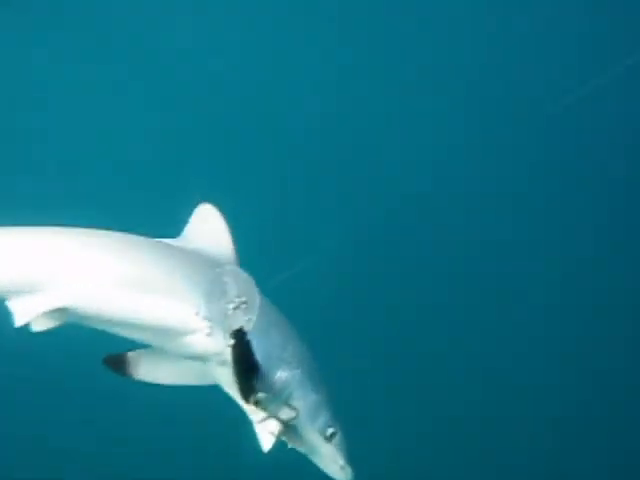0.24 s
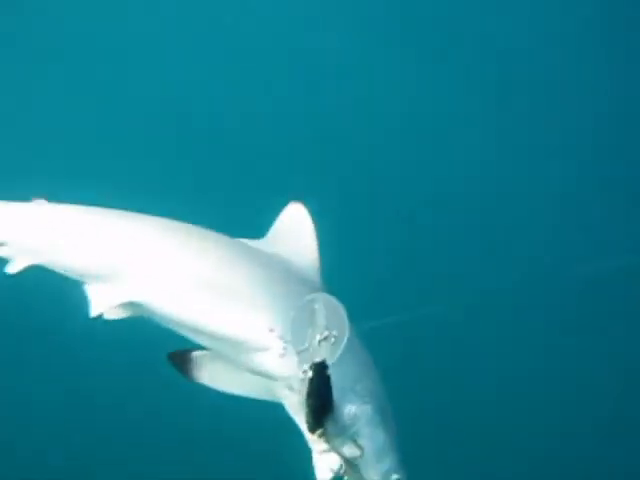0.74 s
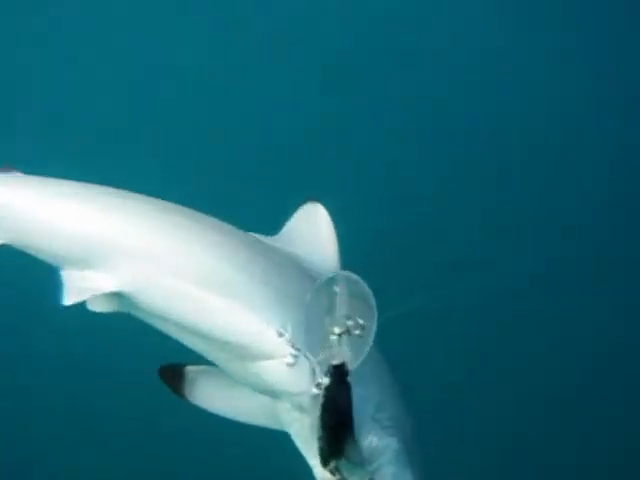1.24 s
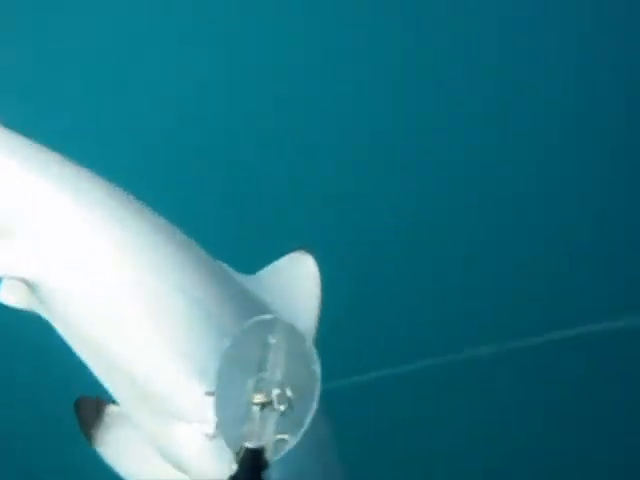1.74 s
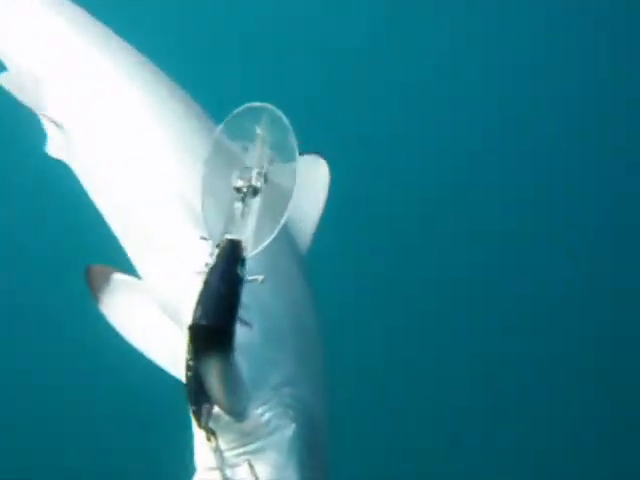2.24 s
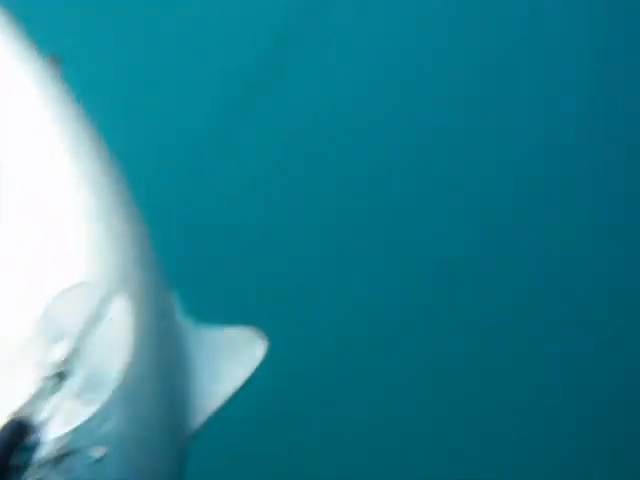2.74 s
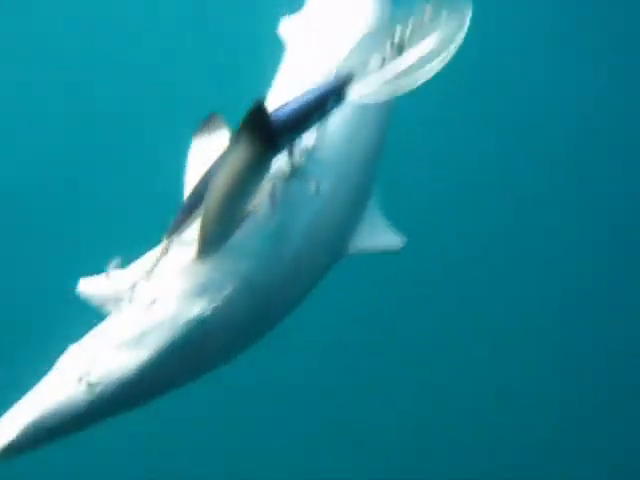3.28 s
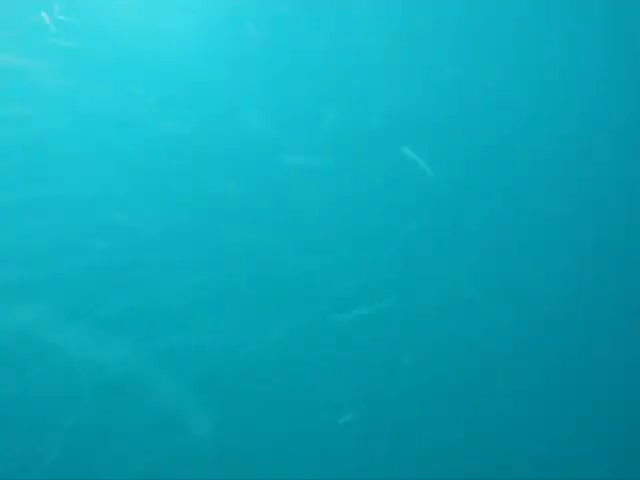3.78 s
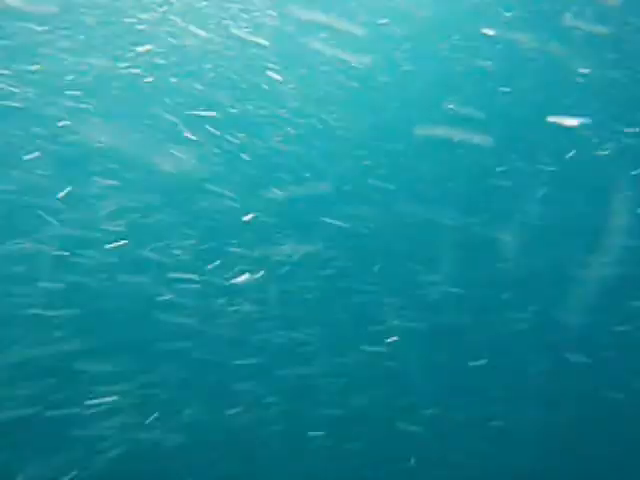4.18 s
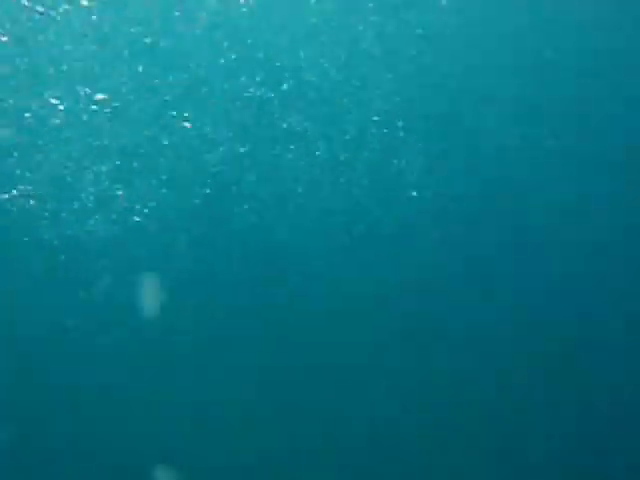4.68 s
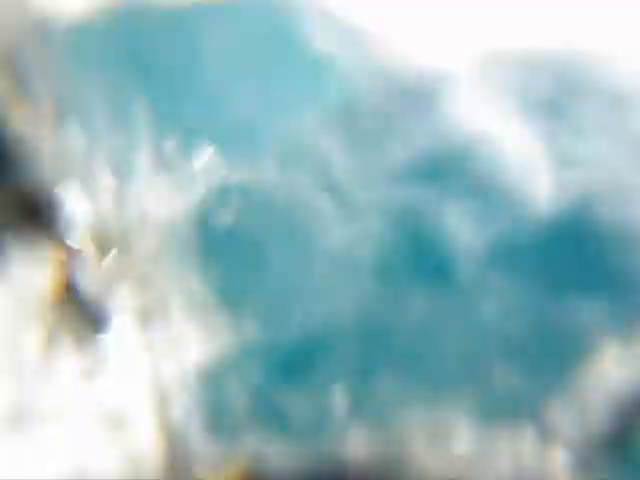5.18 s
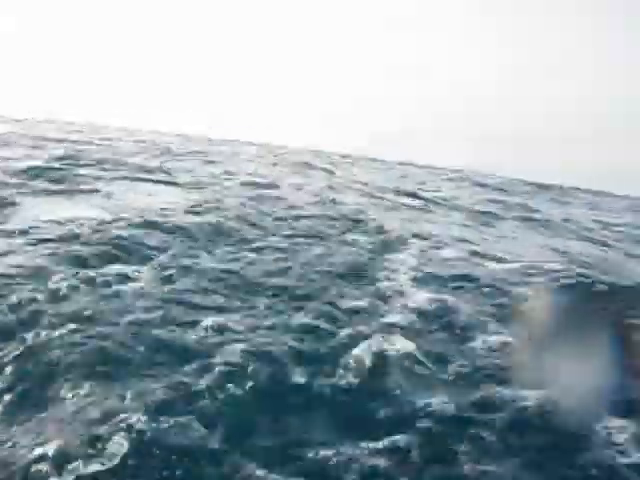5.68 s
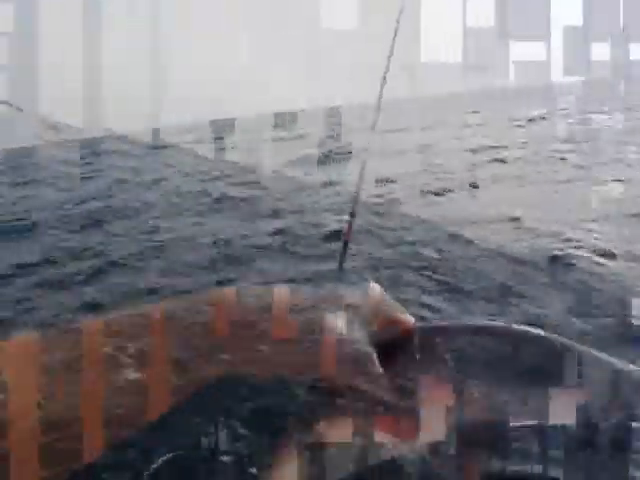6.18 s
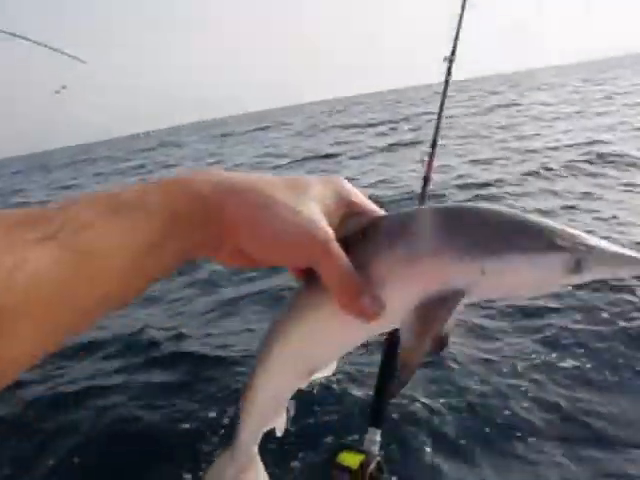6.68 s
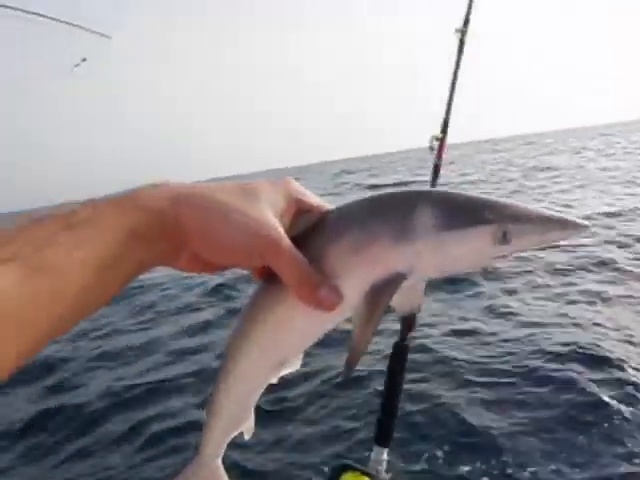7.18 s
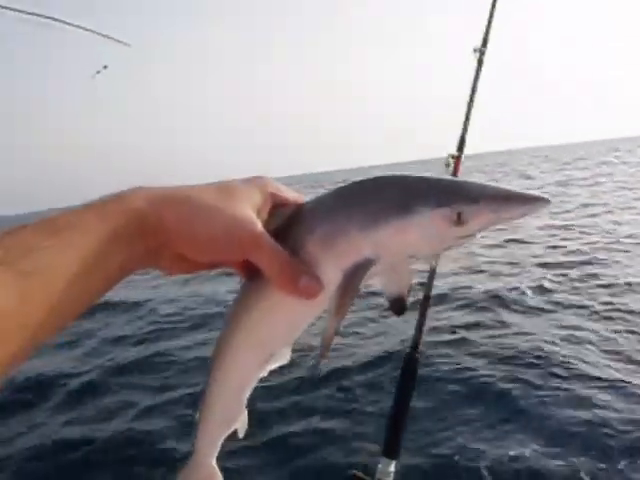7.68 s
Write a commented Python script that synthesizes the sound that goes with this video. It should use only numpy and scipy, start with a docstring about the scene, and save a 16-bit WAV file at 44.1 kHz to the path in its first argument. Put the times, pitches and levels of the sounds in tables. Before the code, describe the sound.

Inside a sealed camera housing towed underwater, two outboard engines make a rough, fluttering, nasal drone with low watery rumbling and hollow metallic rings. Rings crowd together around four seconds, then the housing breaks the surface in harsh slaps and overloaded splashes. The underwater drone stops; muffled engine and sea noise remains with gurgles and slops. Close, narrow, boxy microphone with little bass.

```python
"""A throbbing underwater drone with loud ringing peaks, then slaps and gurgles afloat, overloaded.
A small camera in a sealed housing is towed behind two outboard engines and breaks the surface.
Drone: noise gated by the firings rings the modes of the housing. Peaks: short unsteady cosines with
noise slaps. Water: coloured sparse clicks. Afloat: coloured noise and a wavering sine, the exhaust note.
A limiter, a narrow low-pass and a hard clip shape the sum; a faint camera hiss lies under it."""
import sys
import numpy as np
from scipy import signal
from scipy.fft import rfft, irfft
from scipy.io import wavfile
from scipy.ndimage import uniform_filter1d, minimum_filter1d

SR = 44100
rng = np.random.default_rng(int(sys.argv[2]) if len(sys.argv) > 2 else 0)


def wav_record(signal):
    """Record a signal, one row per channel, as 16-bit PCM in the file named by sys.argv[1]."""
    frames = np.transpose(np.atleast_2d(signal))
    bounded = np.clip(frames, -1, 1)
    # unit amplitude maps onto the largest positive 16-bit level
    quanta = np.round(bounded * 32767).astype(np.int16)
    wavfile.write(sys.argv[1], SR, quanta)


N = 349713


def amp(db):
    """Decibels to gain."""
    return 10 ** (np.asarray(db) / 20)


def evened(x):
    """Scales to unit rms."""
    return x / np.sqrt(np.mean(x ** 2) + 1e-20)


def curves(table, t_s):
    """Every column of a table read at the times t_s, held flat outside it."""
    knots_s, *columns = np.transpose(table)
    return [np.interp(t_s, knots_s, column) for column in columns]


def drift(hz):
    """Slow random curve of unit rms: noise low-passed at hz."""
    slow = signal.lfilter(*signal.butter(2, hz, fs=SR), rng.standard_normal(N + SR))
    return evened(slow[SR:])  # filter settled


def resonate(x, hz, width_hz):
    """Moving resonance: shifts the curve hz down to zero, smooths twice, shifts back."""
    turn = np.exp(2j * np.pi * np.cumsum(hz) / SR)
    r = np.exp(-np.pi * width_hz / SR)
    smooth = signal.lfilter([(1 - r) ** 2], [1, -2 * r, r * r], x / turn)
    return 2 * (turn * smooth).real


def coloured(x, spectrum):
    """Filters x to a spectrum table, log-frequency interpolated; unit rms."""
    f_hz, level_db = np.transpose(spectrum)
    bins_hz = np.fft.rfftfreq(len(x), 1 / SR)
    gain = amp(np.interp(np.log(bins_hz + 1), np.log(f_hz + 1), level_db))
    return evened(irfft(rfft(x) * gain, len(x)))


def lumpy(per_s, spread_db):
    """Sparse clicks of random sign, a few of them large; unit rms."""
    size_db = spread_db * np.minimum(rng.exponential(1, N), 4)
    clicks = amp(size_db) * rng.standard_normal(N)
    return evened(clicks * (rng.random(N) < per_s / SR))


def tent(t_s, centre_s, half_s):
    """Distance from centre_s, in half-lengths."""
    return abs(t_s - centre_s) / half_s


def afloat(t_s):
    """Share of the housing out of the water."""
    return np.clip((t_s - 5.7) / 0.23, 0, 1)


def camera_hiss():
    """Faint steady camera hiss: noise through one broad fixed resonance."""
    noise = rng.standard_normal(N)
    return amp(-60.5) * evened(resonate(noise, np.full(N, 2800.), 1900.0))


# engines and sea through the air-filled housing: f/Hz, level/dB (per Hz)
AIR_SPECTRUM = [(35, -54.5), (60, -17.5), (185, 1), (462, -8.5), (832, -7), (956, -7), (1260, -12),
                (1450, -10), (1580, -15.5), (1780, -13.5), (2010, -13.5), (2120, -23), (2350, -22),
                (3100, -26.5), (3750, -38.5), (4880, -54), (8250, -120)]
AIR_DB = -31.5


def air_bed(t_s):
    """Engines and sea heard afloat: coloured noise with a drifting level."""
    level_db = AIR_DB + 2.1 * drift(15)
    return afloat(t_s) * amp(level_db) * coloured(rng.standard_normal(N), AIR_SPECTRUM)


# exhaust note through the air: t/s, f/Hz, level/dB
EXHAUST_NOTE = [(5.85, 114, -55), (6.3, 115.2, -41.5), (6.4, 111.3, -31), (6.55, 113.9, -42),
                (6.7, 115, -30.5), (6.85, 119.6, -33), (6.95, 116.3, -64)]


def exhaust_note(t_s):
    """One sine of wavering pitch and level."""
    hz, level_db = curves(EXHAUST_NOTE, t_s)
    level_db = level_db + 1.5 * drift(16)
    cycles = np.cumsum(hz * (1 + 0.017 * drift(14))) / SR
    return amp(level_db) * np.sin(2 * np.pi * cycles)


# eddies on the housing: f/Hz, level/dB (per Hz)
FLOW_SPECTRUM = [(18, -74), (30, -33.5), (103, -14), (177, -5), (244, 2), (281, 0), (351, 0), (500, -10.5),
                 (650, -33), (1100, -120)]
# turbulence over the towed housing: t/s, level/dB
EDDIES = [(0, -27.5), (.5, -26), (.555, -36), (.59, -24.5), (.82, -30), (.92, -38), (1.6, -36.5),
          (2, -30.5), (3.1, -30), (3.4, -32.5), (3.85, -29), (4.3, -27.5), (5, -33.5), (5.17, -41),
          (5.33, -28.5), (5.43, -36.5), (5.72, -25.5), (5.8, -45), (6.1, -32)]


def flow(t_s):
    """Low lumps of turbulence roll over the towed housing in uneven surges."""
    under = np.clip((TOW[-1][0] - t_s) / 0.13, 0, 1)
    level_db = curves(EDDIES, t_s)[0] + 1.9 * drift(7)
    return under * amp(level_db) * coloured(lumpy(600, 2.8), FLOW_SPECTRUM)


# firmer modes on the way up: start t/s, end t/s, first f/Hz, last f/Hz, first level/dB, last level/dB
TONES = [(2.302, 4.897, 343.2, 326, -38, -33.5), (3.396, 4.4, 695.4, 695, -29.5, -26.5),
         (3.996, 5.0, 883.6, 901.5, -16.5, -27)]


def tones(t_s, width_hz=17.0, wander=.03, waver_db=5.0, fade_s=0.076):
    """Housing modes that sing: narrow noise bands on wandering pitches, fading in and out."""
    out = np.zeros(N)
    for start_s, end_s, first_hz, last_hz, first_db, last_db in TONES:
        span_s = [start_s, end_s]
        hz = np.interp(t_s, span_s, [first_hz, last_hz]) * (1 + wander * drift(7))
        level_db = np.interp(t_s, span_s, [first_db, last_db]) + waver_db * drift(10)
        fade = np.clip(np.minimum(t_s - start_s, end_s - t_s) / fade_s, 0, 1)
        band = evened(resonate(rng.standard_normal(N), hz, width_hz))
        out = out + fade * amp(level_db) * band
    return out


# white water over the housing: t/s, level/dB
RUSH = [(5.05, -31), (5.14, -34), (5.19, -41.5), (5.64, -26), (5.71, -34), (5.86, -29), (6.07, -18),
        (6.16, -36), (6.29, -22), (6.33, -21), (6.76, -23.5), (6.855, -25.5), (6.875, -42)]


def rush_gain(t_s):
    """Gain of the white water, faded at both ends of its table."""
    fade_in = np.clip((t_s - RUSH[0][0]) / 0.05, 0, 1)
    fade_out = np.clip((RUSH[-1][0] - t_s) / 0.012, 0, 1)
    return amp(curves(RUSH, t_s)[0]) * fade_in * fade_out


# colour of the white water: f/Hz, level/dB (per Hz)
SPRAY_SPECTRUM = [(35, -55.5), (60, -34), (106, -1), (145, -5.5), (357, -2.5), (665, -0.5), (725, -5),
                  (847, -2.5), (956, -10), (1140, -3), (1450, -2.5), (1580, -3.5), (2430, -15),
                  (3380, -23.5), (3750, -38.5), (4880, -73.5), (8250, -120)]


def spray(rush):
    """White water over the housing: dense coloured clicks, level flickering."""
    return rush * amp(1.9 * drift(40)) * coloured(lumpy(4000, 0.6), SPRAY_SPECTRUM)


# colour of the slosh: f/Hz, level/dB (per Hz)
SLOSH_SPECTRUM = [(24, -58), (40, -28.5), (180, 7), (426, 7.5), (577, 1.5), (781, -3), (1410, -18),
                  (1500, -25.5), (1950, -53.5), (3300, -120)]
# water slops at the port: t/s, level/dB, half-length/s
SLOPS = [(5.717, -29, .05), (5.991, -23.5, 0.1), (6.165, -21, .012), (6.207, -15, .012),
         (6.233, -16.5, 0.011), (7.023, -40, .04), (7.1, -39, .03), (7.174, -23, .04), (7.258, -24.5, .04),
         (7.376, -30, .04), (7.518, -22, 0.052), (7.765, -27.5, 0.068), (7.871, -27.5, 0.038),
         (7.925, -22, 0.031)]
SLOP_FALL_DB, CHURN_DB = 14, -6.5  # fall per half-length; stirred slosh re white water


def slosh(t_s, rush):
    """Low lumpy water, stirred by the white water or slopping on its own."""
    slops = sum(amp(db - SLOP_FALL_DB * tent(t_s, s, half_s)) for s, db, half_s in SLOPS)
    stirred = afloat(t_s) * (amp(CHURN_DB) * rush + slops)
    return stirred * amp(3.4 * drift(30)) * coloured(lumpy(500, 2.4), SLOSH_SPECTRUM)


# brief level dips: t/s, depth/dB (negative lifts), half-length/s
DIPS = [(0.338, 10, 0.011), (.625, 12, 0.007), (1.08, 6.5, 0.017), (1.38, 6.5, 0.028), (1.764, 6.5, 0.014),
        (1.864, 3, 0.0078), (2.651, 2.5, 0.025), (2.764, 5.5, 0.012), (3.321, 6, .016), (5.203, 9, 0.019),
        (5.261, 6, 0.01), (5.375, 8, 0.025), (5.467, 1, 0.014), (5.528, 4.5, 0.012), (5.57, 3, 0.0044),
        (5.614, 5, 0.0074), (5.692, 1, 0.022), (6.133, -1.5, .02), (6.174, 5.5, .018), (6.273, 11, 0.036),
        (6.55, 8.5, 0.019)]


def dips(t_s):
    """Gain with smooth hollows at the listed moments."""
    loss_db = sum(depth_db * np.exp(-tent(t_s, s, half_s) ** 2) for s, depth_db, half_s in DIPS)
    return amp(-loss_db)


# random small peaks: start t/s, end t/s, rate/(1/s), middle f/Hz, spread (log f), level/dB, slap level/dB
SMALL_PEAKS = [(0, 6.04, 4.3, 950, 0.054, -16.5, -40), (0, .85, 20, 209.6, 0.31, -21, -42.5),
               (0, 5.05, 2.96, 333, .2, -21.5, -38.5), (5.05, 6.8, 10, 1113, 0.29, -22, -24),
               (6.9, 7, 11, 384, 0.23, -24, -38)]


def small_peaks(scatter_db=3.):
    """Rows like those of LOUD_PEAKS, at random times, pitches and levels."""
    rows = []
    for start_s, end_s, per_s, hz, spread, ring_db, slap_db in SMALL_PEAKS:
        gaps_s = -np.log(1 - rng.random(60)) / per_s
        times_s = start_s + np.cumsum(gaps_s)
        a, b, c = rng.standard_normal((3, 60))
        pitches_hz = hz * np.exp(spread * a)
        drawn = zip(times_s, pitches_hz, ring_db + scatter_db * b, slap_db + 2 * scatter_db * c)
        rows += [row for row in drawn if row[0] < end_s]
    return rows


# loudest peaks of the drone, then slaps and gurgles: peak t/s, f/Hz, level/dB, slap level/dB
LOUD_PEAKS = [(0.317, 170, -12, -34.5), (0.587, 207, -12, -37), (0.598, 955, -19, -22),
              (0.616, 200, -16, -35), (0.67, 250, -13, -43), (0.73, 300, -17, -29.5),
              (0.712, 990, -11.5, -36), (0.786, 950, -7, -50), (1.024, 1026, -5.5, -37),
              (1.199, 952, -2.5, -20), (1.336, 959, -9, -12), (1.395, 947, -12, -35),
              (1.735, 1030, -9.5, -33), (1.839, 965, -5.5, -24), (1.999, 397, -12.5, -44),
              (2.045, 961, -3.5, -14.5), (2.107, 890, -14, -28), (2.212, 945, -13, -43),
              (2.326, 1025, -11, -37.5), (2.521, 346, -21, -43), (2.732, 1110, -2, -20.5),
              (3.002, 968, -8, -34), (3.075, 1044, -1.5, -20), (3.275, 363, -15, -32),
              (3.327, 943, -5.5, -44), (3.639, 869, -4, -15), (3.65, 964, -4.5, -13), (3.727, 896, -2, -22),
              (3.752, 967, -6.5, -19), (3.773, 1006, -14, -23), (3.799, 1015, -7, -15.5),
              (3.878, 1050, -12.5, -16.5), (3.948, 1055, -6.5, -21.5), (4.014, 987, 0, -10),
              (4.055, 825, -6.5, -11.5), (4.131, 905, -4, -11), (4.159, 900, -7, -34),
              (4.186, 765, -4, -11), (4.198, 978, -12, -17.5), (4.268, 927, -5.5, -20),
              (4.324, 870, -8, -18), (4.371, 978, -1.5, -17), (4.478, 892, -3.5, -20),
              (4.519, 920, -6.5, -26), (4.596, 909, -17, -42.5), (5.108, 1280, -13, -14.5),
              (5.127, 1450, -13, -13), (5.142, 1813, -4, -6.5), (5.164, 1216, -1, -6),
              (5.187, 1470, -12, -17.5), (5.254, 850, -12, -11), (5.256, 330, -23, -41),
              (5.314, 326, -14, -32), (5.328, 810, -10, -7.5), (5.33, 195, -18, -40),
              (5.349, 782, -8, -34.5), (5.409, 896, -12.5, -46), (5.439, 1390, -11, -39),
              (5.491, 1080, -10.5, -27), (5.517, 1244, 3, -19), (5.546, 1030, -6, -53), (5.56, 667, 0, -6),
              (5.563, 284, -8, -30), (5.582, 830, -6, -7.5), (5.152, 1106, -4.5, -19),
              (5.588, 894, -4, -10), (5.594, 845, 1, -1), (5.629, 1426, -2.5, -8), (5.638, 860, 1, -0.5),
              (5.818, 1320, -8.5, -42), (5.848, 906, -4, -27), (5.916, 321, -11, -26),
              (5.987, 577, -10, -29), (6.016, 1410, -5.5, -18), (6.023, 382, -10.5, -41),
              (6.053, 610, -13, -15), (6.073, 1372, -2, -10), (6.077, 1347, -1, -10),
              (6.085, 1347, -4, -20), (6.08, 1350, 3, 1), (6.104, 830, -8, -33), (6.137, 1310, -12.5, -23),
              (6.158, 410, -6.5, -26), (6.212, 268, -13, -19), (6.232, 365.8, -8.5, -12),
              (6.473, 493, -14.5, -41), (6.521, 450, -6.5, -16), (6.759, 563, -1, -14),
              (6.798, 258, -9.5, -41), (6.849, 700, -4, -14), (6.87, 343, -15, -19.5),
              (7.025, 305, -18.5, -32), (7.106, 320, -14, -32), (7.178, 560, -14.5, -47.5),
              (7.257, 418, -9.5, -33), (7.298, 462, -18, -35), (7.376, 339, -17, -52),
              (7.425, 944, -17.5, -19), (7.516, 225, -23, -34), (7.778, 269, -26, -43),
              (7.818, 278, -18.5, -34)]
AFLOAT_S = 5.83
PEAK_MS, PEAK_AFLOAT_MS, LONGER_LOW = 6.5, 4., .3  # lengths at 1 kHz; power by which lower ones last longer


def ringing_peaks(rise=0.014, rough=0.26, slap_ms=1.8):
    """Each peak or pop rings a few unsteady cycles, with a short noise slap at its middle."""
    rings, slaps = np.zeros((2, N + SR))
    unsteady = drift(170)
    rows = LOUD_PEAKS + small_peaks()
    for (peak_s, hz, ring_db, slap_db), phase in zip(rows, rng.random((400, 1))):
        ms = (PEAK_MS if peak_s < AFLOAT_S else PEAK_AFLOAT_MS) * (1000 / hz) ** LONGER_LOW
        u = np.arange(-ms, 2.0 * ms, 1000 / SR) / ms  # time from the peak, in lengths
        at = round((peak_s - ms / 1000) * SR) + np.arange(len(u))
        shape = np.exp(-np.where(u < 0, 9.2 * u ** 2, 1.6 * abs(u) ** 0.92))
        pitch_hz = hz * (1 + rise * u + rough * 0.27 * unsteady[at % N])
        cycles = phase + np.cumsum(pitch_hz) / SR
        strength = shape * (1 + rough * unsteady[-at % N])
        rings[at] += amp(ring_db) * strength * np.cos(2 * np.pi * cycles)
        slaps[at] += amp(slap_db) * np.exp(-(u * ms / slap_ms) ** 2)
    wall = signal.butter(3, [600, 2700], "band", fs=SR, output="sos")
    slap_noise = signal.sosfilt(wall, slaps * rng.standard_normal(N + SR))
    return (rings + slap_noise)[:N]


# mean firing rate of each engine: f/Hz
FIRING_HZ = (56.3, 57.8)
# one row per engine, one column per cylinder: firing level/dB
CYLINDERS_DB = [(4.6, -8, 0.5, -4.5, 3.5, -6), (3.3, -4, -1, 5, -13, -1)]


def exhaust(sharp=4.94, bed=0.4, wobble=0.0045, uneven_db=2.5):
    """Each firing blows a burst of bubbles that all but dies before the next; two engines beat slowly."""
    gate = np.full(N, bed)
    for hz, pattern_db in zip(FIRING_HZ, CYLINDERS_DB):
        turns = np.cumsum(hz * (1 + wobble * drift(3))) / SR + rng.integers(6)
        firing = turns.astype(int)
        since = turns % 1  # in firing periods
        strength_db = np.array(pattern_db)[firing % 6] + uneven_db * rng.standard_normal(1000)[firing]
        gate = gate + amp(strength_db) * since * np.exp(-sharp * since) * sharp
    return gate


# air and wall modes: f/Hz, pole width/Hz, level far from wake/dB, level close to wake/dB
HOUSING = [(330, 64.5, -11.5, -3.5), (464, 160, -19, -17), (542.3, 97, -16.5, -3), (663.3, 74, -5, -6.5),
           (731.6, 60, -9.5, -2.5), (880.4, 77, 2.5, -1), (939, 23.5, 2.5, 1), (995, 63, 0.5, -1),
           (1088, 59, -2.5, -5), (1175.5, 94, -3, -6), (1357, 128, -16, -11), (1674, 336, -18.5, -31.5),
           (1959, 317, -19, -24.5), (2308, 470, -28, -33), (2900, 1700, -55, -50.5)]
# the tow: t/s, exhaust level/dB, tuning factor, nearness to wake (0-1), lift of high modes/dB
TOW = [(0, -16.5, 1.016, 0.4, -1.5), (.6, -18, 1.036, .15, -3), (1.5, -17, 1.054, 0, -1.5),
       (1.85, -17, 1.006, .25, -0.5), (2.7, -16.5, 1, 0.5, 1), (3.5, -17.5, .99, .9, -2),
       (3.65, -12.5, 0.99, 0.9, -6), (4.15, -14, 1.017, 1, 4), (4.25, -18.5, 1.012, 1, 3.5),
       (4.7, -19, 1.01, .4, 2), (5.05, -17.5, 1.02, 0.3, 0.5), (5.15, -21.5, 1.03, 0.1, 6.5),
       (5.3, -20.5, 1.024, 0.1, -2.5), (5.62, -14.5, 1.05, .5, 3.5), (5.72, -22.5, 1.08, .5, -0.5),
       (5.9, -21, 1.17, .2, 2.5), (6.1, -24.5, 1.2, 0, 11.5)]


def drone(t_s):
    """Exhaust noise rings the housing, whose modes shift and trade strength on the way up."""
    drone_db, tuning, near, lift_db = curves(TOW, t_s)
    near = np.clip(near, 0, 1)
    gate = exhaust()
    noise = rng.standard_normal(N)
    rung = np.zeros(N)
    for k, (hz, width_hz, far_db, near_db) in enumerate(HOUSING):
        bursts = noise * gate ** (0.63 + 0.48 * hz / 2000)  # small, high bubbles follow firings more sharply
        high = np.clip((hz - 1100) / 600, 0, 1)
        level_db = far_db + near * (near_db - far_db) + high * lift_db + 0.74 * drift(6.3)
        wavering_hz = hz * tuning * (1 + 0.0088 * drift(3.34))
        mode = np.sqrt(width_hz) * evened(resonate(bursts, wavering_hz, width_hz))
        rung = rung + (-1) ** k * amp(level_db) * mode
    under = np.clip((TOW[-1][0] - t_s) / 0.024, 0, 1)  # stops as the housing leaves the water
    return under * amp(drone_db + 0.74 * drift(9)) * evened(rung)


def scene():
    """Everything heard inside the housing, over the faint camera hiss."""
    t_s = np.arange(N) / SR
    rush = rush_gain(t_s)
    splashing = spray(rush) + slosh(t_s, rush)
    dipped = dips(t_s) * (flow(t_s) + tones(t_s) + splashing + drone(t_s))
    surface = air_bed(t_s) + exhaust_note(t_s)
    return (camera_hiss() + surface + dipped + ringing_peaks())[None]


CAMERA_HZ, EDGE_HZ = 3880, 15800


def record(dry):
    """A quick limiter holds peaks down; the camera's narrow band overshoots and is shaved flat."""
    peak = -minimum_filter1d(-abs(dry), size=101)
    fall_db = np.arange(N) * 210.0 / SR  # recovery, 210 dB/s
    over_db = np.maximum(20 * np.log10(peak / .5 + 1e-9), 0)
    held_db = np.maximum.accumulate(over_db + fall_db, axis=1) - fall_db
    limited = dry / amp(0.9 * uniform_filter1d(held_db, size=81))
    limited = signal.lfilter(*signal.butter(1, 150, "high", fs=SR), limited)  # small microphone, little bass
    band = signal.firwin(401, CAMERA_HZ, window=("kaiser", 8), fs=SR)
    narrow = signal.oaconvolve(limited, band[None], "same")
    clipped = np.clip(narrow, -.5, .5) + amp(-98) * rng.standard_normal(dry.shape)
    edge = signal.firwin(511, EDGE_HZ, window=("kaiser", 9), fs=SR)
    return signal.oaconvolve(clipped, edge[None], "same")


dry = scene()
out = record(dry)
wav_record(out)
```